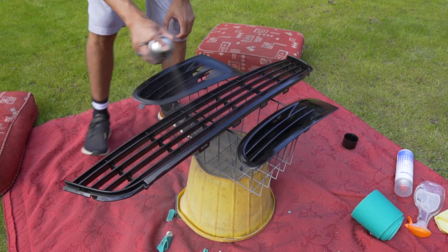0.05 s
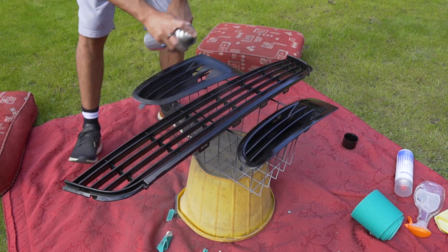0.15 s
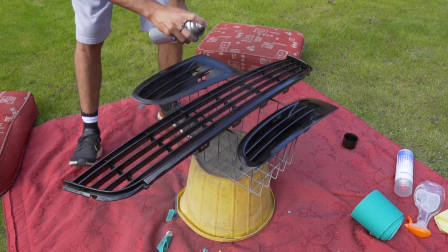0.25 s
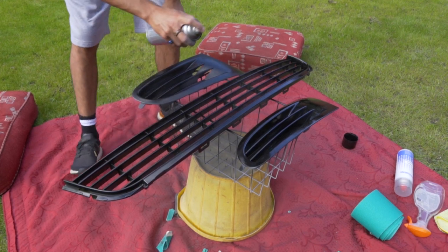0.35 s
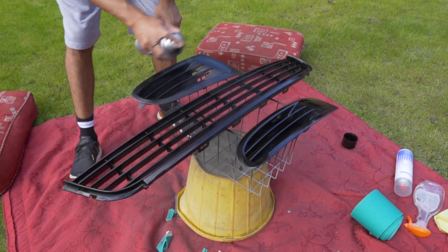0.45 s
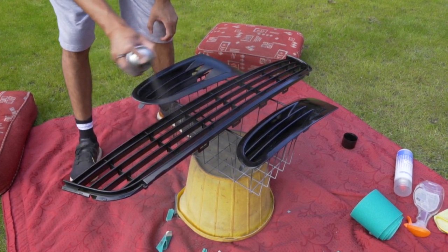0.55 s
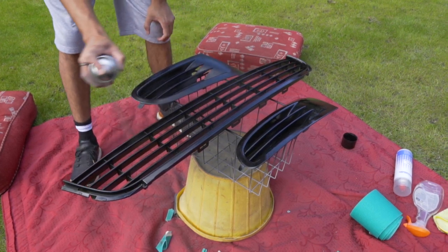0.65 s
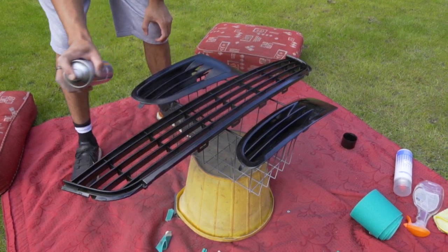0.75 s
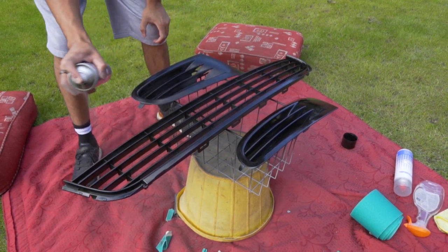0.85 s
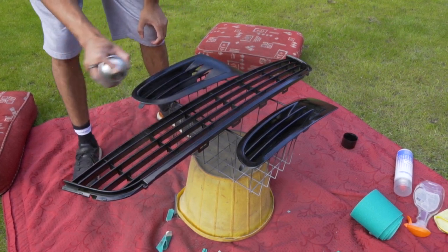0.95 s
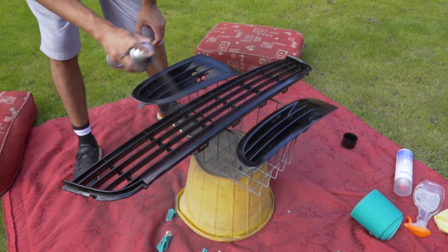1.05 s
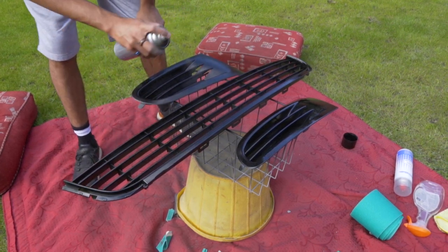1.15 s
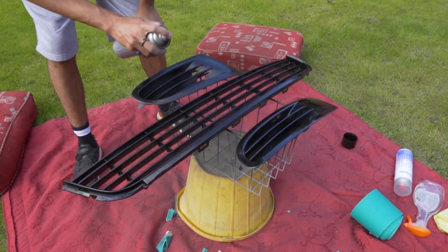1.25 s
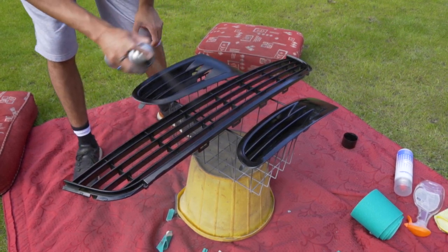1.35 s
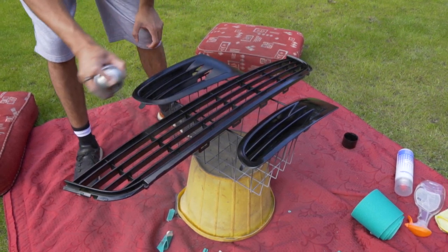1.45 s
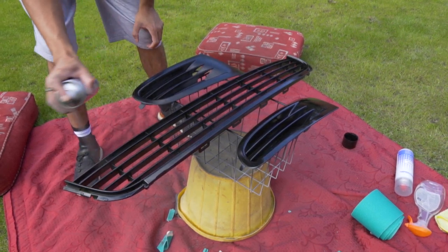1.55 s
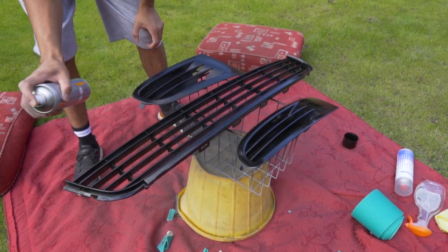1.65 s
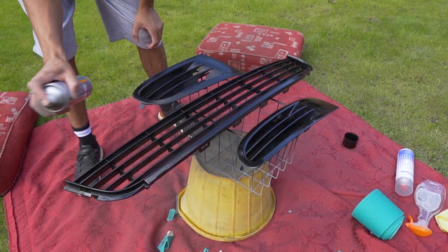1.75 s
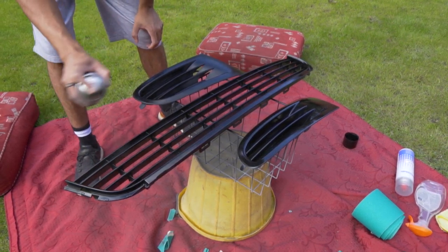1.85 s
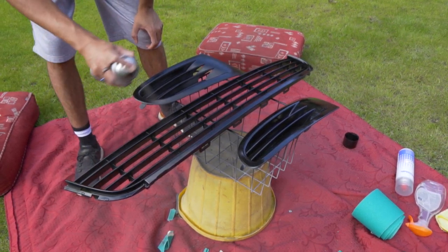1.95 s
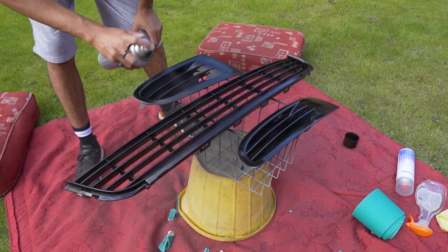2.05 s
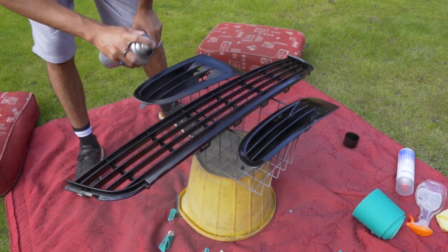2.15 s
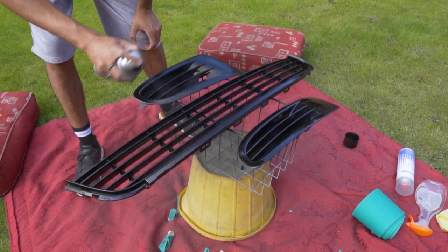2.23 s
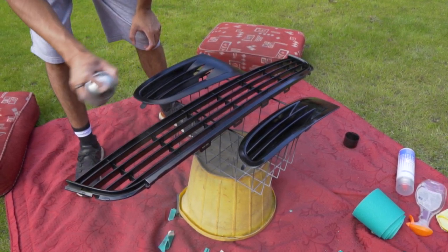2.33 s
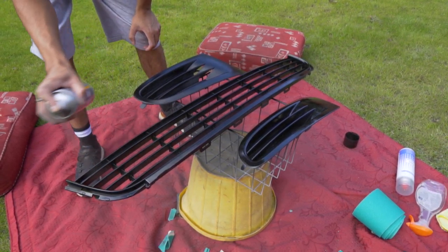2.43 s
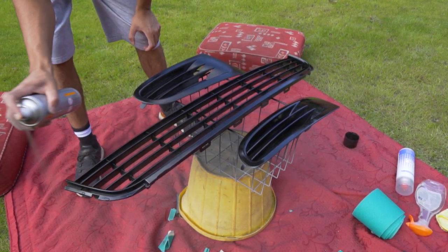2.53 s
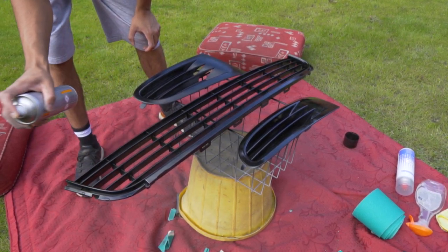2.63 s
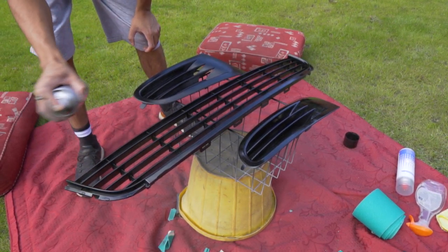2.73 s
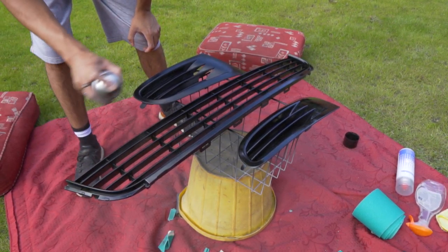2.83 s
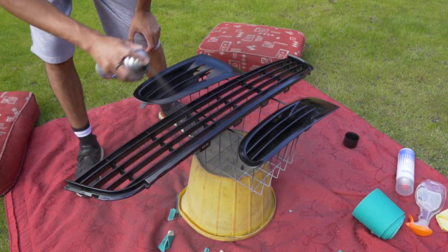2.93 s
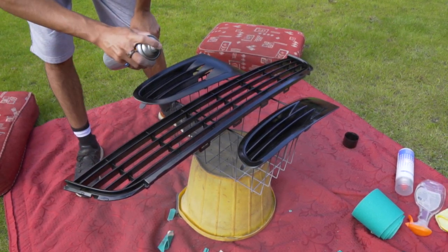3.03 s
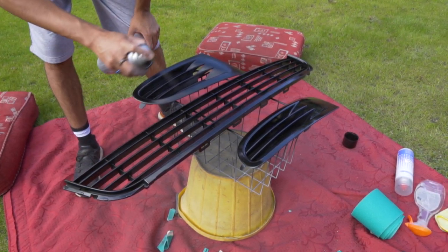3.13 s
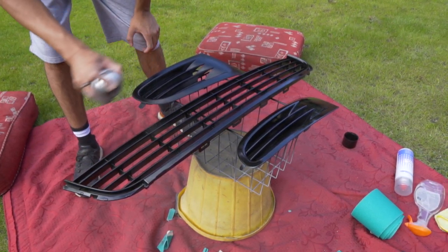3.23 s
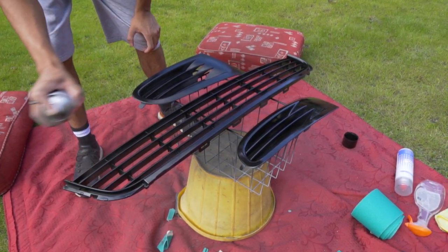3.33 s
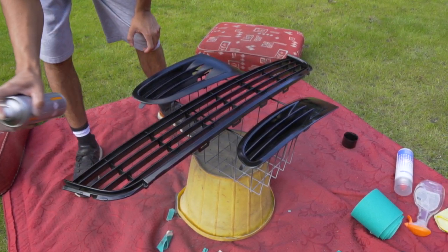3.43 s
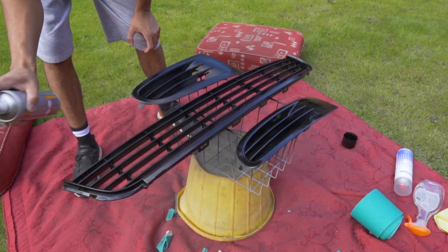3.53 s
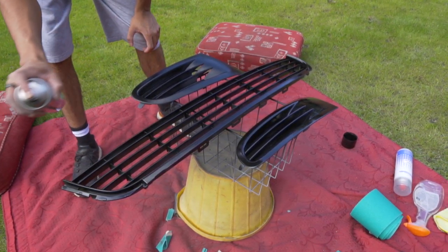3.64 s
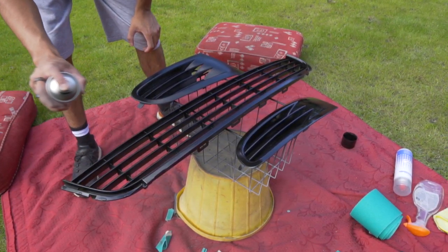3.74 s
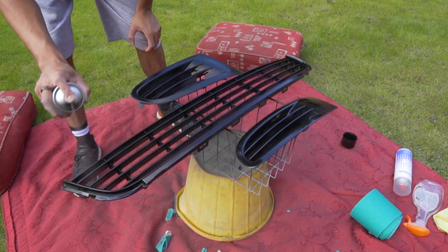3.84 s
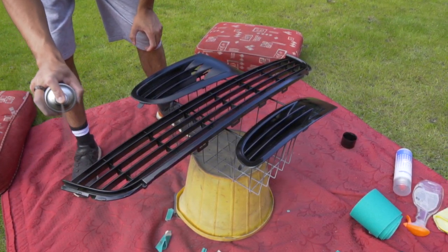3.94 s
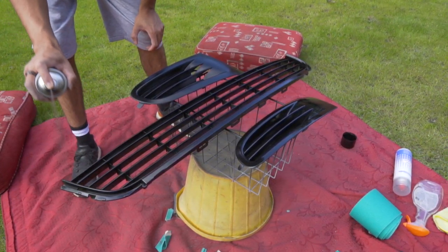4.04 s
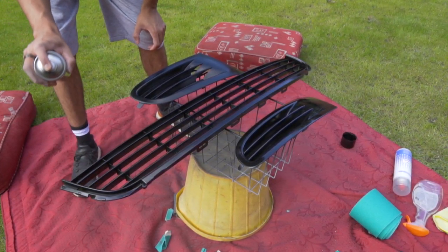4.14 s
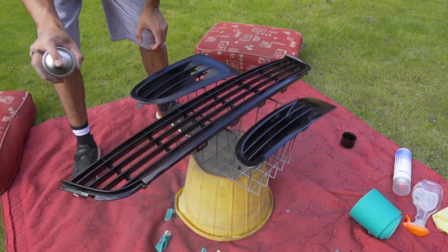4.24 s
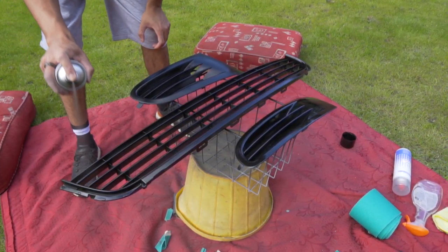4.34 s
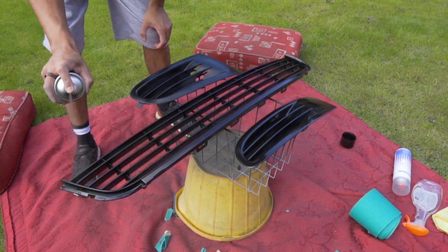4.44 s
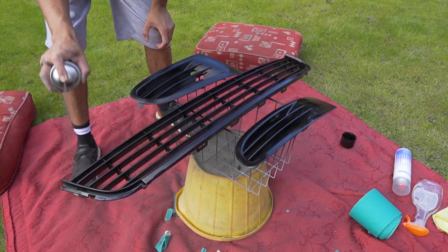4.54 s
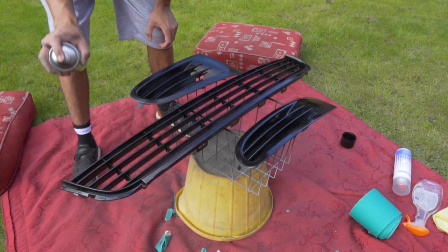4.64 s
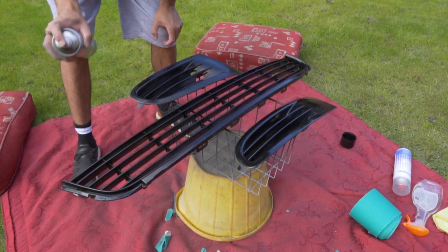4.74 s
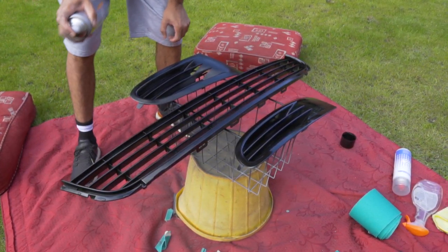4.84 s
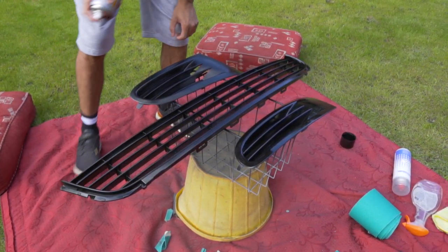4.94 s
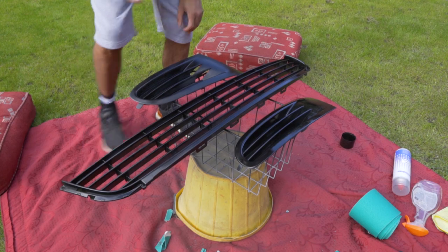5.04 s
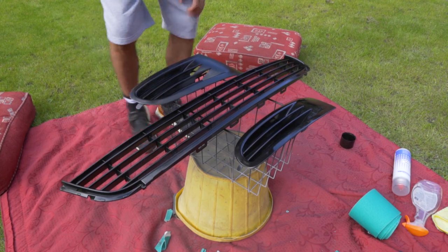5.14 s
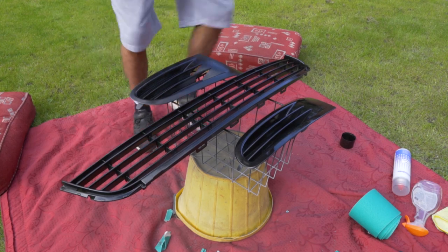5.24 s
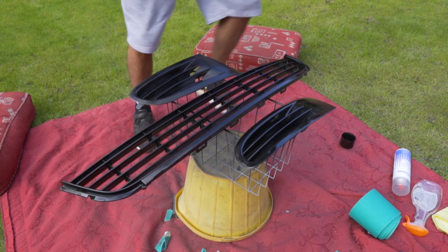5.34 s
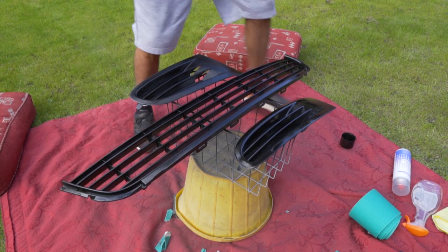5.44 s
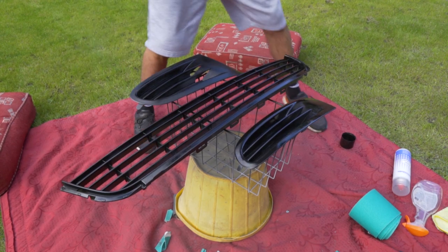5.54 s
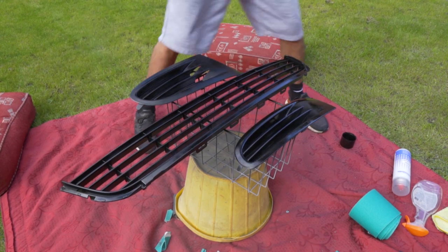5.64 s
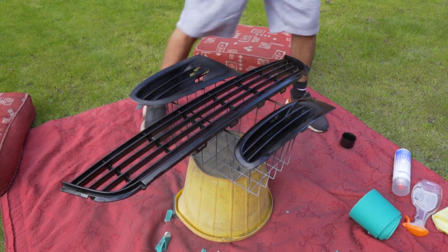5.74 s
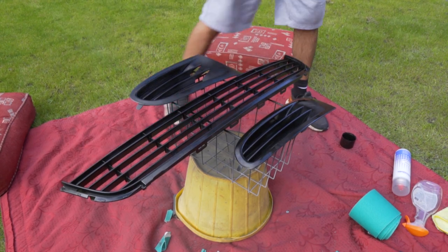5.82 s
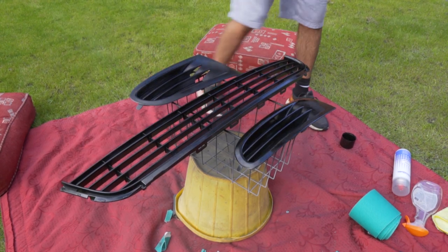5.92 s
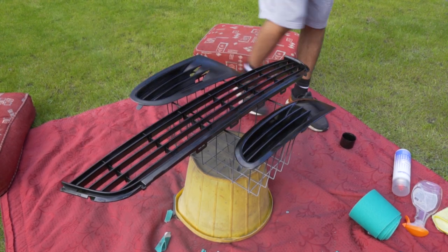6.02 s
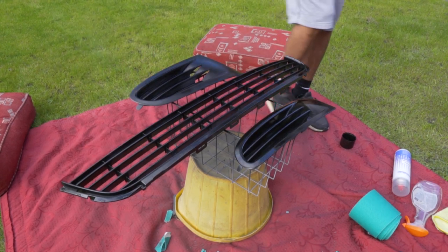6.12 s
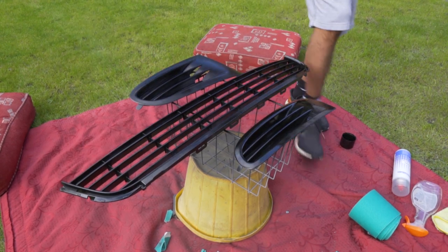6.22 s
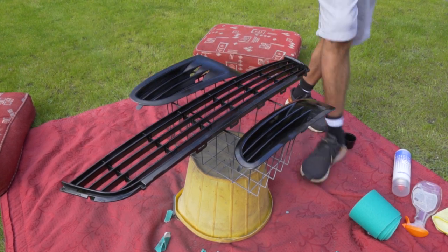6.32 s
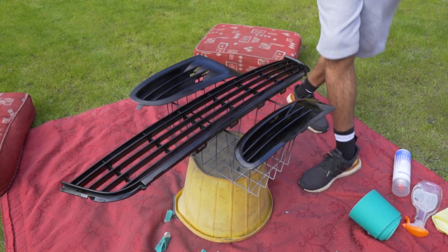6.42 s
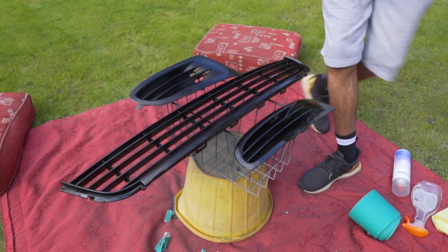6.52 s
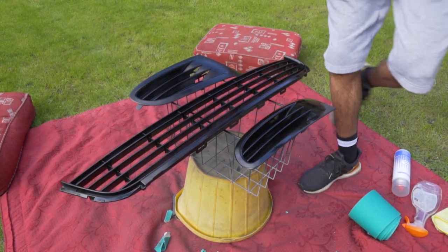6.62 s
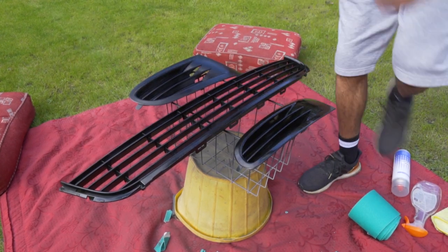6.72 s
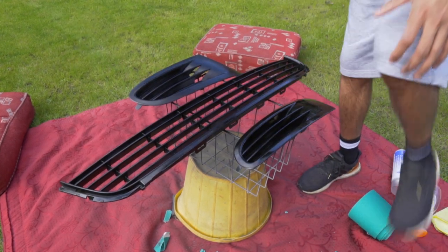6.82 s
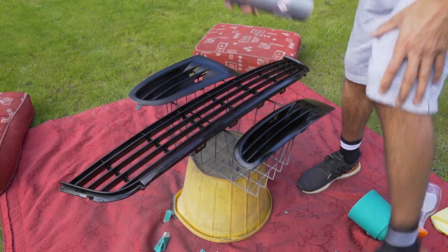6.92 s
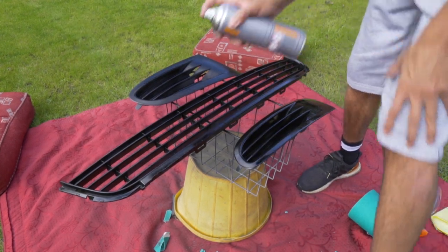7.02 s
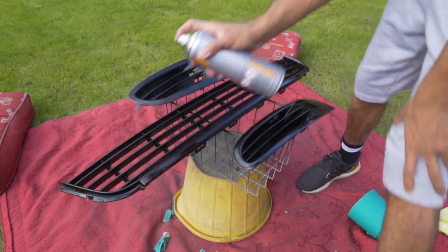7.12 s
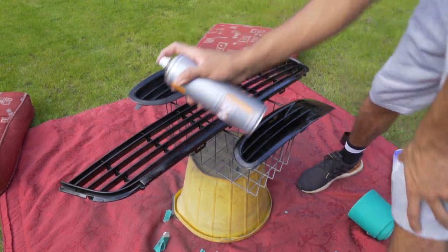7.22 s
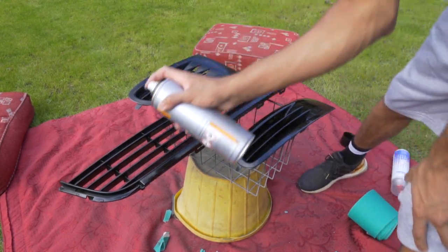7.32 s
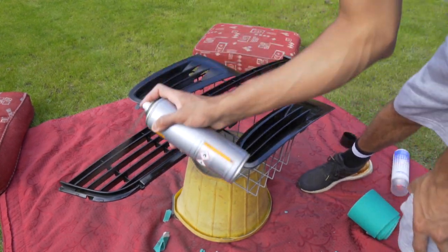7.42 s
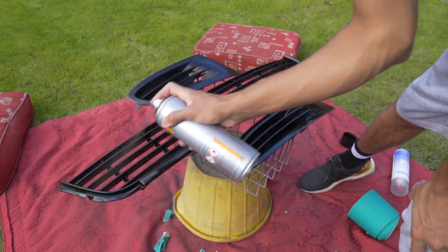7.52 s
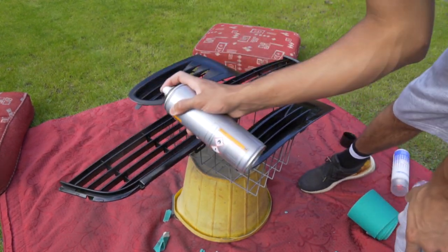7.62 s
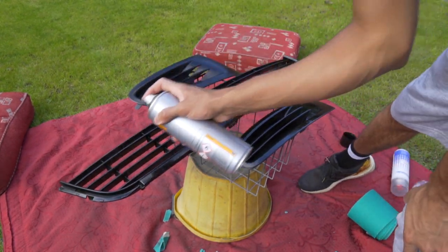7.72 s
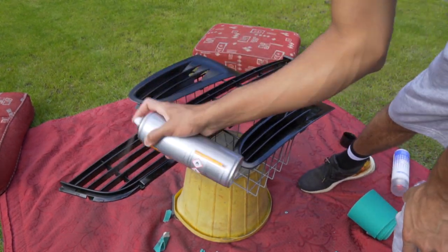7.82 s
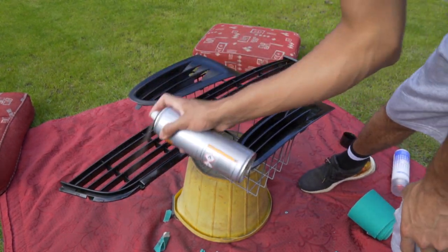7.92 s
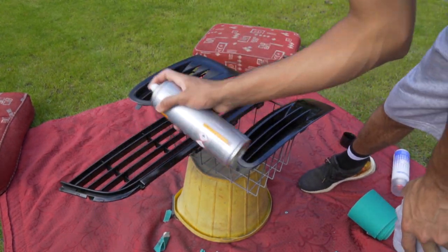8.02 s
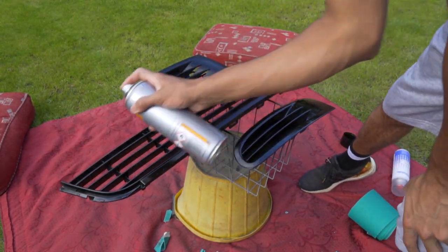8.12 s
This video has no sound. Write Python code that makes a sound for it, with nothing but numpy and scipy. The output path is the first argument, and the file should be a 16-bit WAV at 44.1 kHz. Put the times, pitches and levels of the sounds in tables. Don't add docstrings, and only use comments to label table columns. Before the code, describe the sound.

Ten short bright aerosol squirts at a steady pace outdoors, then a can shaken with hard ball rattles, and two final squirts over distant traffic hum.

```python
import sys
import numpy as np
from scipy import signal
from scipy.fft import rfft, irfft, next_fast_len
from scipy.io import wavfile
from scipy.ndimage import map_coordinates

SR = 44100
rng = np.random.default_rng(int(sys.argv[2]) if len(sys.argv) > 2 else 0)


def log_audio(samples):
    frames = np.atleast_2d(samples).T
    limited = np.clip(frames, -1, 1)
    pcm = np.round(limited * 32767).astype(np.int16)
    wavfile.write(sys.argv[1], SR, pcm)


def natural_amplitude(level_db):
    exponent = np.asarray(level_db, float) / 20
    return 10 ** exponent


N = 360293


def rms_one(x):
    return x / np.sqrt(np.mean(x ** 2) + 1e-20)


def in_time(rows):
    s, *columns = np.transpose(rows)
    return [np.interp(np.arange(N) / SR, s, column) for column in columns]


def drift(rate):
    pole = np.exp(-80 * np.pi * rate / SR)
    white = rng.standard_normal(N // 40 + 2002)
    slow = signal.lfilter([1], [1, -2 * pole, pole * pole], white)[2000:]
    return np.interp(np.arange(N) / 40, np.arange(len(slow)), rms_one(slow))


def coloured(x, spectrum):
    size = next_fast_len(N)
    hz, db = np.transpose(spectrum)
    log_hz = np.log(np.arange(size // 2 + 1) * SR / size + 1)
    gain = natural_amplitude(np.interp(log_hz, np.log(hz), db))
    return rms_one(irfft(rfft(x, size) * gain, size)[:N])


def band(x, low_hz, high_hz):
    return signal.sosfilt(signal.butter(2, [low_hz, high_hz], "band", fs=SR, output="sos"), x)


def low_pass(hz):
    return signal.butter(2, hz, fs=SR, output="sos")


def ring(t, hz, t60):
    return (t > 0) * np.sin(2 * np.pi * hz * t) * natural_amplitude(-60 * np.abs(t) / t60)


def lobe(centre_hz, width_hz):
    slow = signal.sosfilt(low_pass(width_hz / 2), rng.standard_normal((2, N)))
    phase = 2 * np.pi * np.cumsum(centre_hz) / SR
    return rms_one(slow[0] * np.cos(phase) + slow[1] * np.sin(phase))


# frequency in Hz, density in dB per Hz.
TRAFFIC_SPECTRUM = [(12, -21), (20, -2.5), (41, 0), (81, -7.5), (163, -11), (228, -9.5), (399, -17),
                    (446, -14), (499, -15), (574, -16), (825, -10.5), (897, -8), (1660, -21.5),
                    (1860, -26.5), (16000, -68)]
# time in seconds, pitch in Hz, level in dB.
ENGINE_NOTE = [(0.9, 80.2, -58), (1.32, 80, -51), (1.5, 79.9, -40), (1.62, 80, -46.5), (1.82, 80.2, -64),
               (2.1, 81.4, -38.5), (2.22, 81.2, -43), (2.38, 80.5, -36.5), (2.75, 80, -52),
               (4.16, 77, -49.5), (4.6, 70, -49.5), (5.3, 64.2, -46), (5.6, 63, -56)]


def traffic():
    hz, engine_db = in_time(ENGINE_NOTE)
    sounding = in_time([(.6, 0), (.9, 1), (5.6, 1), (5.9, 0)])[0]
    tone = np.sqrt(2) * np.sin(2 * np.pi * np.cumsum(hz) / SR)
    engine = sounding * natural_amplitude(engine_db + 1.0) * tone
    roar = coloured(rng.standard_normal(N), TRAFFIC_SPECTRUM)
    return natural_amplitude(-38 + 0.15 * drift(2.8)) * roar + engine


def yard(x):
    near_t60_s, near_db, far_t60_s, far_db = 0.23, -24.5, 0.41, -30
    t = np.arange(SR // 2) / SR
    noise = rng.standard_normal((2, len(t))) * (t > .004)
    near = band(noise[0] * natural_amplitude(-60 * t / near_t60_s), 3000, 15000)
    far = band(noise[1] * natural_amplitude(-60 * t / far_t60_s), 900, 9000)
    tail = natural_amplitude(near_db) * near / np.linalg.norm(near) + natural_amplitude(far_db) * far / np.linalg.norm(far)
    return signal.fftconvolve(x, tail)[:N]


# lag in seconds, level in dB.
REFLECTIONS = [
    (.002, -12),
    (.021, -28),
    (.031, -30),
    (.053, -38),
]


def fences(x):
    response = np.zeros(SR // 10)
    for lag_s, db in REFLECTIONS:
        smear = rng.standard_normal(80) * np.exp(-np.arange(80) / 25)
        first = round(lag_s * SR)
        response[first:first + 80] = natural_amplitude(db) * smear / np.linalg.norm(smear)
    return signal.fftconvolve(x, band(response, 2300, 14000))[:N]


# frequency in Hz, density in dB per Hz.
RUSTLE_SPECTRUM = [(1500, 18), (3000, 10), (5000, 8), (8000, 3), (10500, -5), (13000, -3.5), (16000, -15)]
# peak in seconds, peak level in dB, decay in dB per second.
SURGES = [
    (4.96, -42.5, 16),
    (5.24, -40.5, 74),
    (5.66, -37, 124),
    (5.96, -39, 119),
    (6.6, -45.5, 24),
    (6.95, -45, 40),
    (7.26, -47, 33),
]


def slosh():
    t, white = np.arange(N) / SR, rng.standard_normal((2, N))
    bed = coloured(white[0], RUSTLE_SPECTRUM) * natural_amplitude(2 * drift(20))
    swish = natural_amplitude(-34) * np.exp(-((t - 5.255) / .03) ** 2) * band(white[1], 4400, 4900)
    splash = natural_amplitude(-43.5) * np.exp(-((t - 5.517) / 0.017) ** 4) * band(white[1], 4200, 9500)
    power = np.zeros(N)
    for s, db, fall_db in SURGES:
        below_db = np.where(t < s, 135 * (s - t), fall_db * (t - s))
        power += natural_amplitude(db - below_db) ** 2
    return natural_amplitude(-5.0) * np.sqrt(power) * bed + swish + splash


# time in seconds, peak level in dB, wall ring in Hz,
# dome relative level in dB, top relative level in dB.
SLAMS_ON_WALL = [(5.1401, -24, 8000, -2.5, -40), (5.3804, -12.5, 5800, -14.5, -17),
                 (5.452, -24.5, 7400, -4, -21), (5.5819, 0.5, 5900, -21, -35), (5.608, -6.5, 3330, -4, -40),
                 (5.637, -13, 4960, -7, -9), (5.7966, -1.5, 5950, -20, -8), (5.802, -12, 4430, -12.5, -20),
                 (5.9444, 4.5, 6120, -23.5, -35), (5.9465, 1, 6360, -24, -19), (6.1676, -5, 4500, -18, -34),
                 (6.3734, 2, 6900, -39, -10), (6.517, -17, 5170, -3, -11), (6.7548, -2.5, 3770, -20, -26),
                 (6.9043, 5, 6020, -42, -28), (6.9274, 0.5, 6300, -16.5, -44), (7.099, -2.5, 2620, -29, -5),
                 (7.1034, -6.5, 2760, -5, -22), (7.183, -11.5, 4060, 0.5, -27), (7.56, -6, 3950, -27, -16),
                 (8.0614, -8.5, 3690, -13.5, -14)]
# time in seconds, peak level in dB, dome ring in Hz,
# dome relative level in dB.
DROPS_ON_DOME = [(4.958, -41, 1400, -2), (5.112, -18, 1760, -5), (5.162, -29, 1580, -2),
                 (5.3653, -50, 1400, 11), (5.429, -23, 1660, -8), (5.4682, -26, 1710, -4),
                 (5.6718, -21, 1800, -7), (5.684, -24, 1820, -7), (5.694, -28, 1700, -13),
                 (5.739, -39, 1400, 4), (5.8516, -14, 1400, -21), (5.8526, -17.5, 1710, -24),
                 (5.881, -24, 1760, -1.5), (5.903, -27, 1780, -1), (6.0526, -14, 1660, -5.5),
                 (6.0833, -19, 1740, 0), (6.104, -22.5, 1730, -5), (6.2577, -15.5, 1800, -1.5),
                 (6.306, -20.5, 1820, -3.5), (6.4337, -11.5, 1820, -3), (6.589, -23.5, 1670, -9),
                 (6.8155, -10, 1440, -1.5), (6.8634, -47, 1400, 11), (7.024, -8, 1580, 0.5),
                 (7.238, -19, 1650, 7.5), (7.27, -21.5, 1690, 0.5), (7.2878, -27, 1750, -1),
                 (7.296, -31, 1750, -1), (7.6387, -19.5, 1400, -9), (8.1274, -16.5, 1490, -6.5)]
# time in seconds, peak level in dB, wall ring in Hz.
LIGHT_TICKS = [(2.6752, -24.5, 4440), (2.694, -35, 7000), (2.7072, -39, 7500), (2.7184, -39, 6900),
               (2.7313, -41, 7000), (3.862, -37, 7800), (4.351, -39, 7500), (5.481, -26, 5400),
               (5.49, -29, 4060), (5.6566, -18, 5030), (5.975, -16, 4700), (6.217, -35, 4960),
               (6.341, -29, 3200), (6.561, -20.5, 4800), (6.6065, -34, 5000), (6.618, -31, 2970),
               (6.6254, -31, 2880), (6.713, -38, 8500), (6.7322, -37, 3760), (6.844, -32, 2000),
               (6.959, -24, 1900), (7.655, -19, 4460), (7.7068, -24, 3500), (7.7194, -23, 3870),
               (7.7296, -21, 4100), (7.745, -25, 3810), (7.7748, -20.5, 3700), (7.7944, -37, 2590),
               (7.815, -24, 3660)]


def touches():
    slams = [(s, db, hz, 1700, dome_db, top_db) for s, db, hz, dome_db, top_db in SLAMS_ON_WALL]
    drops = [(s, db, 2800, hz, dome_db, -12.5) for s, db, hz, dome_db in DROPS_ON_DOME]
    ticks = [(s, db, hz, 1620, -11.5, -11.5) for s, db, hz in LIGHT_TICKS]
    return slams + drops + ticks


# frequency in Hz, level in dB, decay time t60 in seconds.
WALL_MODES = [(3060, -10, 0.012), (4350, -10, 0.011), (6390, -8.5, 0.0025)]


def contact(t):
    crack_s, shell_s, shell_db, tail_s, tail_db = 0.0054, 0.027, -15, 0.052, -26
    noise = rng.standard_normal(len(t))
    chatter = np.repeat(natural_amplitude(5 * rng.standard_normal(len(t) // 70)), 70)
    decay = natural_amplitude(-60 * t / crack_s) + natural_amplitude(shell_db - 60 * t / shell_s)
    decay += chatter * natural_amplitude(tail_db - 60 * t / tail_s)
    burst = noise * (1 - np.exp(-t / 0.000067)) * decay
    burst[:3] += 2.32 * np.hanning(5)[1:4]
    return burst


def ball():
    out, t = np.zeros(N + SR), np.arange(SR // 10) / SR
    for s, peak_db, wall_hz, dome_hz, dome_db, top_db in touches():
        burst = contact(t)
        wall = 2.8 * band(burst, wall_hz * 0.59, wall_hz * 1.24)
        for gain, low_hz, high_hz in [(2.24, 1790, 7440), (0.51, 900, 2200), (1.25, 2090, 2620),
                                      (0.4, 480, 1200), (.5, 5600, 10900)]:
            wall += gain * band(burst, low_hz, high_hz)
        for hz, db, t60 in WALL_MODES:
            strong, detune = rng.standard_normal(2)
            wall += natural_amplitude(db + 3 * strong) * ring(t, hz * (1 + .04 * detune), t60)
        top = band(burst * natural_amplitude(-60 * t / .06), 11500, 15500)
        dome = ring(t, np.clip(dome_hz, 1400, 1820), .014) * (1 - np.exp(-(t / .0015) ** 2))
        dome += 0.86 * band(burst, 930, 2390)
        knock = wall / np.abs(wall).max() + natural_amplitude(top_db - 3.0) * top / np.abs(top).max()
        knock += natural_amplitude(dome_db + 7.0) * dome
        first = round(s * SR)
        out[first:first + len(t)] += natural_amplitude(peak_db + 1.18) * knock
    return out[:N]


LOWER_DB, LOWER_LEADS = -13.5, 0.28
# valve cracks in seconds, valve shut in seconds, jet level in dB,
# time to full flow in seconds, time the finger eases off in seconds.
SQUIRT_TIMES = [(-.1, 0.305, -26.5, .02, 0.14), (0.44, 0.789, -26.5, 0.035, 0.021),
                (.906, 1.264, -26, 0.012, 0.074), (1.361, 1.692, -26, 0.018, 0.018),
                (1.818, 2.142, -26, 0.028, 0.065), (2.281, 2.64, -25.5, 0.074, 0.032),
                (2.752, 3.092, -26, .013, 0.027), (3.205, 3.521, -26, 0.016, 0.031),
                (3.878, 4.153, -25.5, 0.014, .035), (4.372, 4.676, -25.5, .02, .05),
                (7.439, 7.711, -27.5, 0.012, .025), (7.817, 8.067, -28, 0.01, 0.034)]


def valve():
    leak_s, leak_db = 0.0045, -46
    crack_s, crack_db = .004, -11.5
    eased_s, eased_db, shut_s, shut_db = 0.014, -5, .003, -15.5
    t, jet_db, lost_db = np.arange(N) / SR, np.full(N, -140.), np.zeros(N)
    for start, end, db, fill_s, ease_s in SQUIRT_TIMES:
        on = (t > start - leak_s) & (t < end + leak_s)
        opening = [start - leak_s, start + crack_s, start + crack_s + fill_s]
        closing = [end - eased_s - ease_s, end - eased_s, end - shut_s, end + leak_s]
        flow_db = [leak_db, crack_db, 0, 0, eased_db, shut_db, leak_db]
        lost_db[on] = np.interp(t[on], opening + closing, flow_db)
        jet_db[on] = db + lost_db[on]
    return jet_db, LOWER_DB - LOWER_LEADS * np.maximum(lost_db, -20)


def arc(share, start, middle, end):
    bend = (start + end - 2 * middle) / 2
    return middle + (end - start) * (share - .5) + bend * (2 * share - 1) ** 2


# first lobe in Hz at start, middle and end, second lobe in Hz in the middle.
WRIST_TURN = [(7800, 8000, 8500, 12800), (8700, 8200, 8000, 13000), (8610, 8050, 8700, 12500),
              (8180, 7900, 8800, 12900), (8830, 8100, 8050, 12900), (8090, 8450, 8200, 12800),
              (9000, 8100, 9400, 13000), (8110, 8200, 9100, 13000), (7940, 7650, 8000, 12300),
              (7630, 7700, 7650, 12250), (8800, 8550, 7500, 11950), (8500, 8100, 8500, 12250)]
# lag in milliseconds at start, middle and end.
PARTS_LAG = [(.75, .6, .495), (.535, .59, .675), (.68, .625, .59), (.62, .645, .665), (.665, .605, .605),
             (.585, .625, .62), (.545, .482, .515), (.515, .475, .49), (.745, .664, .615),
             (.685, .66, .658), (.54, .56, .6), (.505, .504, .518)]


def sweep():
    share, rows = np.linspace(0, 1, 9), []
    away = (2 * share - 1) ** 2
    for (start, end, *_), (*first, second_hz), lag in zip(SQUIRT_TIMES, WRIST_TURN, PARTS_LAG):
        seconds = start + share * (end - start)
        rows += zip(seconds, arc(share, *first), second_hz - 500 * away, 1.5 - 8 * away,
                    arc(share, *lag), .85 + .3 * away)
    return in_time(rows)


# frequency in Hz, density in dB per Hz.
JET_SPECTRUM = [(1200, -18.5), (1900, -13), (2250, -12.5), (2500, -13), (2900, -14.5), (4000, -14),
                (5200, -10.5), (6400, -9.5), (10300, -14.5), (14500, -14), (16000, -6.5)]
ECHO_STRENGTHS = (.27, .11, .2)


def jet():
    jet_db, low_db = valve()
    first_hz, second_hz, second_db, parts_ms, ribs_ms = sweep()
    hiss = coloured(rng.standard_normal(N), JET_SPECTRUM)
    lower = signal.sosfiltfilt(low_pass(5600), hiss)
    lobes = lobe(1.4 * first_hz - 3300, 1920)
    lobes += natural_amplitude(0.72 * second_db - 0.5) * lobe(second_hz, 2400)
    direct = hiss - lower + lower * natural_amplitude(low_db + 15.0) + natural_amplitude(-3.0) * lobes
    nozzle_db = -26.5 + (low_db - LOWER_DB) / LOWER_LEADS
    direct += natural_amplitude(nozzle_db) * lobe(np.full(N, 2403), 320)
    direct *= natural_amplitude(jet_db - 3.0 + 0.83 * drift(35))
    ground_ms = 2.88 + .05 * drift(3)
    treble = band(direct, 5000, 19000)
    out = direct.copy()
    for share, lag_ms in zip(ECHO_STRENGTHS, (parts_ms, ground_ms, ribs_ms)):
        lag_ms = lag_ms + .02 * drift(4)
        glint = natural_amplitude(4 * np.clip(drift(9.8), -3, 1.2))
        heard_from = np.arange(N) - lag_ms * SR / 1000
        out += share * glint * map_coordinates(treble, [heard_from], order=3, mode="nearest")
    return out


def scene():
    knocks = ball()
    can = jet() + knocks + fences(knocks) + slosh()
    return np.tile(can + yard(can) + traffic(), (2, 1))


def roll_off(x):
    return signal.sosfilt(signal.butter(12, 16250, fs=SR, output="sos"), x)


def record(dry):
    steep = signal.cheby2(18, 45, 15950, fs=SR, output="sos")
    cut = signal.sosfilt(steep, dry)
    return roll_off(np.clip(cut, -1, 1))


dry = scene()
out = record(dry)
log_audio(out)
```